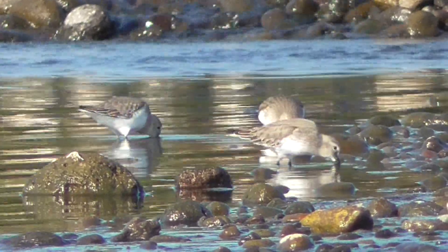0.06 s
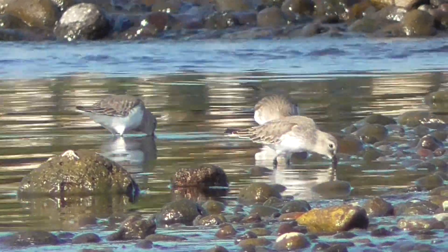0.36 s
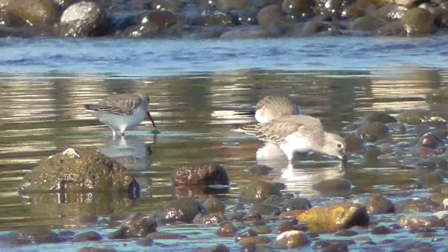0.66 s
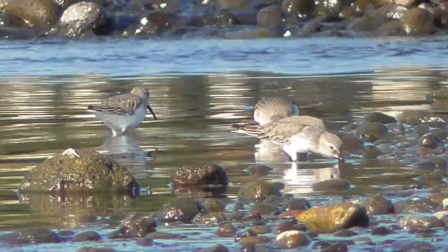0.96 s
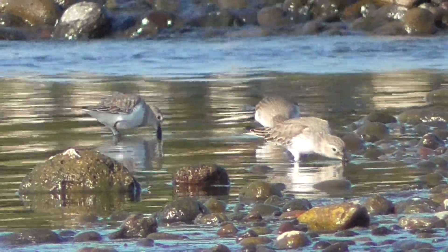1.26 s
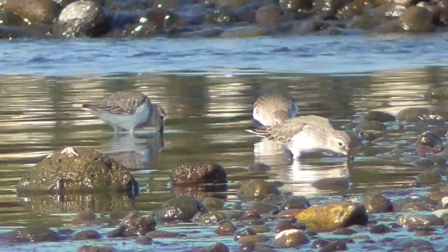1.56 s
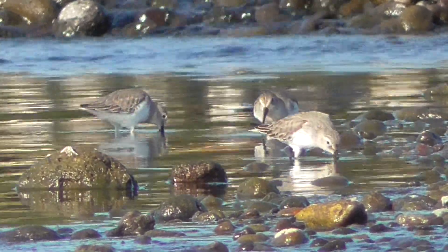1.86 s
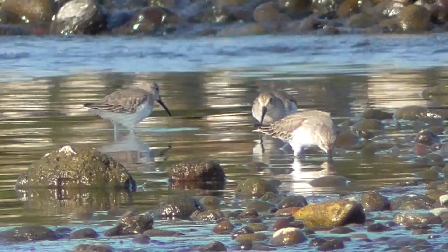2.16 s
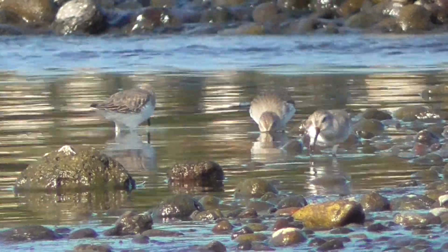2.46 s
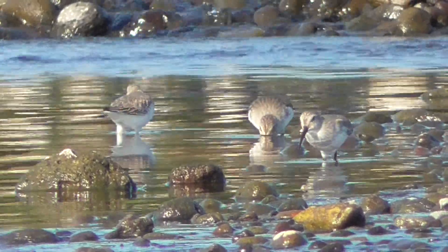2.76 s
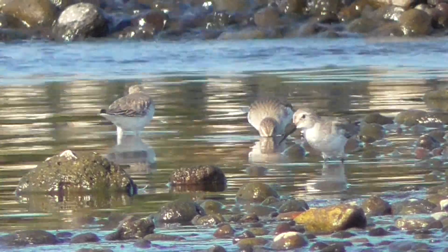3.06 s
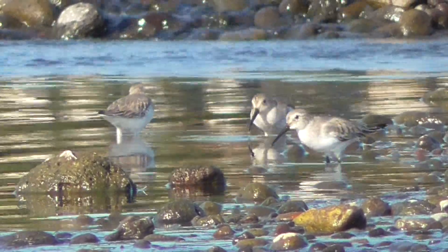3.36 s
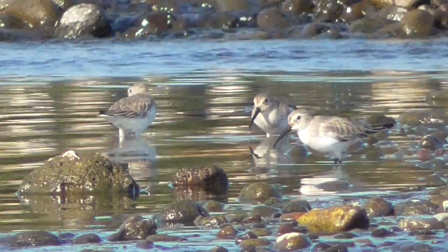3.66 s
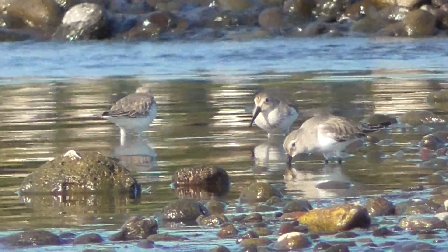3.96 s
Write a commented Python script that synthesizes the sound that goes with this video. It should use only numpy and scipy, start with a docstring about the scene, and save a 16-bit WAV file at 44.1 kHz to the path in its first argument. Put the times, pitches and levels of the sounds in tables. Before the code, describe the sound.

Short, sharp shorebird chirps sound above softly rushing water, wind and a distant engine drone.

```python
"""A stony shore, where small wading birds give ten thin chirps: each is a whistle that shoots up
and slides down with a fast warble. A far bird adds two faint whistles, and the stones and the bank
scatter a short tail after each call. Behind them are a few tiny drips, a low rush of water and wind,
and the wavering drone of a distant engine."""
import sys
import numpy as np
from scipy import signal
from scipy.fft import rfft, irfft
from scipy.io import wavfile
from scipy.ndimage import uniform_filter1d

SR = 44100
rng = np.random.default_rng(int(sys.argv[2]) if len(sys.argv) > 2 else 0)


def int16_out(signal):
    """Quantize to a 16-bit WAV file."""
    q = np.round(np.clip(np.atleast_2d(signal).T, -1, 1) * 32767)
    wavfile.write(sys.argv[1], SR, q.astype(np.int16))


N = 176400

TOP_S, FLICK_S, SAG_START_S = .009, .0062, .0062  # timed from the start of a chirp
WARBLE_HZ, WARBLE_DEPTH_HZ, ROUGHNESS, ROUGH_HZ = 131, 560, .16, 900
THROAT_WIDTH_HZ, OCTAVE_DB, RIGHT_LAG_S = 5300, -29, .00002
# Pitch curve of a chirp: (time [ms], share of the top pitch [ratio])
GLIDE = [(0, .29), (2, .38), (3.5, .63), (5.3, .87), (9, 1), (13, .98), (17, .93), (21, .85), (25, .815),
         (29, .8), (32, .73), (35, .64), (38, .53)]
# Volume curve of a chirp: (time [ms], gain [dB])
ENVELOPE = [(0, 8), (3, -4), (5.5, -1.5), (9, 0.5), (17, -6), (21, 0.5), (25, 2.5), (29, -5), (33, -1),
            (38, -14)]
def chirp(top_hz, sag_hz, throat_hz, db, flick_db, fade_db_per_s, crest_dip_db, pan_db):
    """One slightly rough, warbling whistle, favoured where it crosses the throat's resonance."""
    glide_ms, share = np.array(GLIDE).T
    t = np.arange(int(glide_ms[-1] * SR / 1000)) / SR
    t_ms, since_top = t * 1000, t - TOP_S
    warble = np.cos(2 * np.pi * WARBLE_HZ * since_top)
    sag = sag_hz * (t > SAG_START_S) * (1 - t / t[-1] / 2)  # steps in, then eases off
    hz = (top_hz + WARBLE_DEPTH_HZ * warble) * np.interp(t_ms, glide_ms, share) - sag
    throat = 1 / (1 + ((hz - throat_hz ** 2 / hz) / THROAT_WIDTH_HZ) ** 2)
    flick = flick_db * np.clip(2 * (1 - t / FLICK_S), 0, 1)  # trims the upward attack
    contour = np.interp(t_ms, *np.array(ENVELOPE).T)
    fade = fade_db_per_s * np.maximum(since_top, 0)
    gain = undb(db + flick + contour - crest_dip_db * warble - fade)
    lowpass = signal.butter(2, ROUGH_HZ, fs=SR, output="sos")
    shimmer, jitter = ROUGHNESS * unit(signal.sosfilt(lowpass, rng.standard_normal((2, len(t)))))
    phase = turn(hz) + jitter - 2 * np.pi * hz * np.array([[0], [RIGHT_LAG_S]])
    tone = throat * np.sin(phase) + undb(OCTAVE_DB) * np.sin(2 * phase)
    return pan(pan_db) * gain * (1 + shimmer) * signal.windows.tukey(len(t), .1) * tone


# Chirp cues; the reverb send is higher when the bird faces away:
# (time of the top [s], top pitch before warble and sag [Hz], sag [Hz], throat resonance [Hz],
#  base level [dB], flick gain [dB], fade [dB/s], dip at warble crests [dB], pan left [dB], send [dB])
CHIRPS = [(0.638, 8030, 0, 6950, -43, -3, 0, 1, 3, 0), (.7360, 8200, 302, 6430, -44, 3, -50, 3, 1.5, -1.5),
          (0.833, 7200, -250, 6400, -49, 6, -58, 2, 2, 4),
          (1.2588, 8200, 250, 7000, -46, -8, 140, -1, 3.5, 0),
          (1.6088, 7930, -150, 6900, -44.5, -10, 60, 3, 3, 1),
          (1.9456, 8100, 102, 6600, -49, -4, -90, 5.5, 3, 2),
          (2.706, 7970, 330, 7300, -48.5, -16, 360, 0, 4, 4.5),
          (2.7968, 7950, 498, 7040, -48, -4, 120, 0, 2.5, 4.5),
          (3.1742, 7700, 220, 7100, -46, -18, 260, 0, 4, 0),
          (3.2828, 7850, 400, 7200, -48, -18, 450, 0, 5, 5)]
# Whistles of the far bird: (time [s], length [s], centre pitch [Hz], level [dB])
WHISTLES = [(2.439, .06, 8950, -73), (2.538, 0.088, 8860, -69)]
def birds(whistle_fall_hz_per_s=1500, whistle_send_db=6):
    """Near chirps and far, gently falling whistles, as a direct sound and a send to the stones."""
    direct, send = np.zeros((2, 2, N))
    for at, *voice, send_db in CHIRPS:
        call = chirp(*voice)
        add(direct, call, at - TOP_S)
        add(send, undb(send_db) * call, at - TOP_S)
    for at, length, hz, db in WHISTLES:
        t = np.arange(int(length * SR)) / SR
        pitch = hz - whistle_fall_hz_per_s * (t - length / 2)
        whistle = undb(db) * signal.windows.tukey(len(t), .5) * np.sin(turn(pitch))
        add(direct, whistle, at)
        add(send, undb(whistle_send_db) * whistle, at)
    return direct, send


def shore_reflections(send, t60_s, db, build_s=.009):
    """The shore scatters a call into a dense, dying tail, different at each ear."""
    t = np.arange(SR // 2) / SR
    envelope = np.exp(-np.log(1000) * t / t60_s) * np.minimum(t / build_s, 1) ** 2
    tail = rng.standard_normal((2, len(t))) * envelope
    tail /= np.sqrt(np.sum(tail ** 2, axis=1, keepdims=True))
    return undb(db) * signal.fftconvolve(send, tail, axes=1)[:, :N]


# Drips among the stones: (time [s], band centre [Hz], attack level [dB])
DRIPS = [(.122, 8600, -62), (.476, 9500, -61), (1.012, 9600, -63), (2.2, 7500, -66), (3.259, 9600, -59),
         (3.446, 7500, -61), (3.672, 9240, -63)]
def drips(decay_s=.0045, half_width_hz=810):
    """Tiny bright splashes: bursts of narrow noise that die within milliseconds."""
    out, t = np.zeros(N), np.arange(SR // 20) / SR
    for at, hz, db in DRIPS:
        band = signal.butter(2, [hz - half_width_hz, hz + half_width_hz], "band", fs=SR, output="sos")
        splash = unit(signal.sosfilt(band, rng.standard_normal(len(t))))
        add(out, undb(db) * np.exp(-t / decay_s) * splash, at)
    return out


# EQ curves of the rush and the hiss, mid and side: (frequency [Hz], relative density [dB])
RUSH_MID = [(25, -41), (35, -20.8), (55, -8.5), (85, -5), (120, -3.5), (170, -0.5), (235, -1.6), (295, -5),
            (420, -4), (600, -2), (670, -4), (735, -8.5), (850, -3), (990, -10), (1170, -8.5), (1500, -18),
            (1820, -27), (2030, -23.5), (2300, -30.5), (2800, -38.5)]
RUSH_SIDE = [(15, -53), (25, -25), (177, -3), (203, -1.5), (289, -2), (366, -3.5), (438, -4), (1170, -10),
             (1580, -20.5), (2170, -24), (2800, -35), (3640, -63), (6160, -120)]
HISS_MID = [(1410, -28), (2400, -7), (2500, -0.5), (2850, -4), (3490, -1), (4180, -2), (5320, -8),
            (6620, -11.5), (9190, -7.5), (15500, -18)]
HISS_SIDE = [(1410, -36), (2400, -12.5), (3960, -14.5), (4380, -21), (4840, -9.5), (5490, -31), (6170, -19),
             (8300, -8), (15500, -12.5)]
# Fader ride on the rush: (time [s], gain [dB])
SWELL = [(0, -0.1), (.6, 0.5), (.95, 0), (1.1, -1), (1.7, -.5), (2.2, -.5), (2.4, -0.1), (3.1, 0),
         (4, -0.5)]
def water_and_wind():
    """A bed of water and wind: a low, gently swelling rush under a faint, wide hiss."""
    swell = undb(np.interp(np.arange(N) / SR, *np.array(SWELL).T))
    mid = swell * undb(-42.5) * noise(RUSH_MID) + undb(-64.5) * noise(HISS_MID)
    side = swell * undb(-57.5) * noise(RUSH_SIDE) + undb(-73) * noise(HISS_SIDE)
    return mid + side * np.array([[1], [-1]])


# The engine's strongest tone: (time [s], pitch [Hz], level [dB])
MAIN_TONE = [(0, 360, -45.5), (.3, 360, -47.5), (.75, 366.8, -56), (1, 368.7, -52), (1.3, 363.7, -59),
             (1.8, 365, -60), (2.25, 368.6, -50), (2.699, 366, -48), (3.0, 365, -51.5), (3.3, 366.6, -56),
             (3.7, 366, -48), (4, 370.3, -48.5)]
# Its weaker tones: (pitch [Hz], start level [dB], end level [dB])
WEAK_TONES = [(210.4, -54, -65.5), (261.6, -57, -54), (327.2, -56, -56.5)]
def engine(wander_hz=1.69, waver_db=2.6, pan_db=-1.5):
    """A distant engine's low tones waver and fade on their long way through the air."""
    t = np.arange(N) / SR
    at, main_hz, main_db = np.array(MAIN_TONE).T
    tones = [(hz, np.linspace(start_db, end_db, N) + waver_db * drift(7))
             for hz, start_db, end_db in WEAK_TONES]
    tones.append((np.interp(t, at, main_hz), np.interp(t, at, main_db) + drift(7.04)))
    drone = sum(undb(db) * np.sin(turn(hz + wander_hz * drift(12))) for hz, db in tones)
    return np.sqrt(2) * drone * pan(pan_db)


def undb(db):
    """Decibels to gain."""
    return 10 ** (np.asarray(db) / 20)


def unit(x):
    """Scale to rms 1."""
    return x / np.sqrt(np.mean(x ** 2))


def add(out, x, start_s):
    """Mix a sound in at its cue."""
    i = max(int(start_s * SR), 0)
    out[..., i:i + x.shape[-1]] += x[..., :N - i]


def pan(db):
    """Left and right gains for a level difference; positive is left."""
    return undb(np.array([[db], [-db]]) / 2)


def turn(hz):
    """Phase of a gliding tone."""
    return 2 * np.pi * np.cumsum(hz) / SR


def drift(rate_hz):
    """Slow, smooth random modulation of rms 1."""
    hold = int(SR / rate_hz)
    steps = np.repeat(rng.standard_normal(200), hold)[:N]
    return unit(uniform_filter1d(uniform_filter1d(steps, hold), hold))


def noise(eq_curve):
    """Noise of rms 1 shaped by an EQ curve, falling steeply beyond its ends."""
    hz, db = np.array(eq_curve).T
    f = np.maximum(np.fft.rfftfreq(N, 1 / SR), 1)
    rolloff = np.minimum(1, np.minimum(f / hz[0], hz[-1] / f)) ** 10
    gain = undb(np.interp(np.log(f), np.log(hz), db)) * rolloff
    return unit(irfft(rfft(rng.standard_normal(N)) * gain, N))


def scene():
    """Birds and their reflections up front, over drips, water, wind and engine."""
    direct, send = birds()
    stones = shore_reflections(send, t60_s=.15, db=-9.5)
    bank = shore_reflections(send, t60_s=.35, db=-18)
    return direct + stones + bank + drips() + water_and_wind() + engine()


def record(dry):
    """A steep high cut at 15.7 kHz on the whole mix."""
    return signal.sosfilt(signal.ellip(12, .1, 80, 15700, fs=SR, output="sos"), dry)


dry = scene()
out = record(dry)
int16_out(out)
```